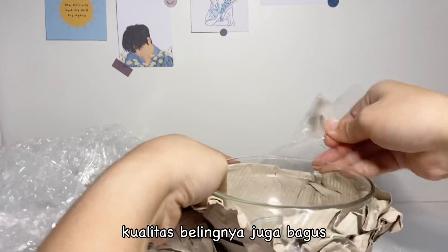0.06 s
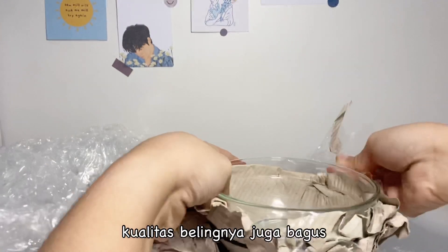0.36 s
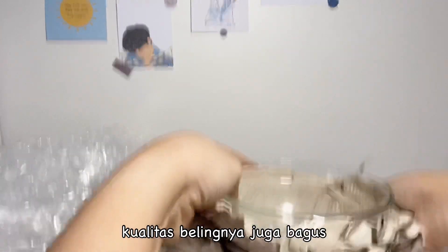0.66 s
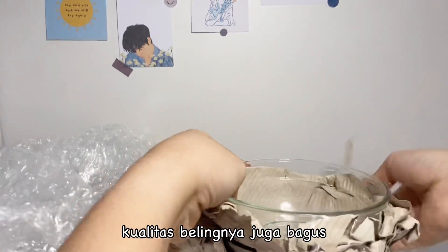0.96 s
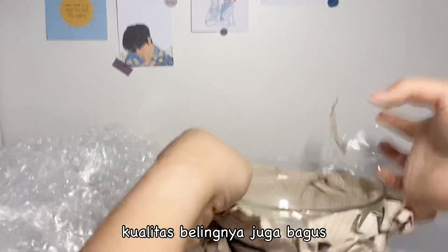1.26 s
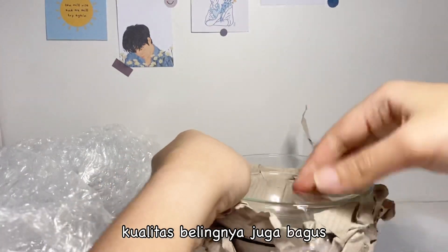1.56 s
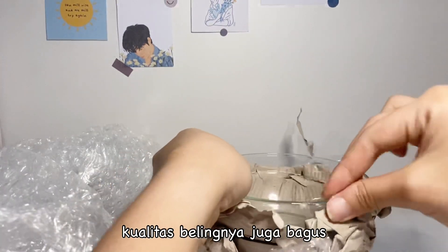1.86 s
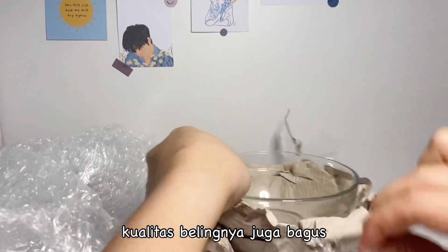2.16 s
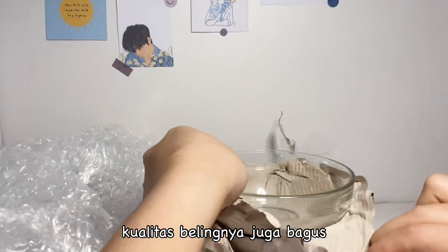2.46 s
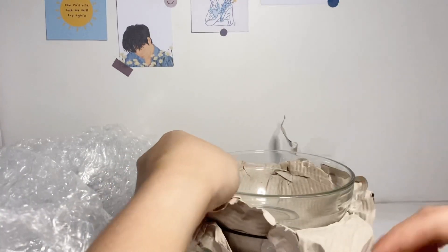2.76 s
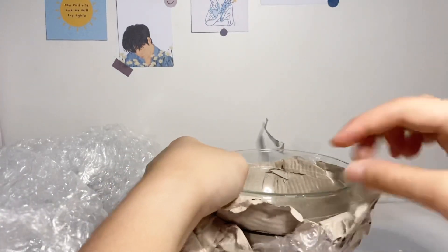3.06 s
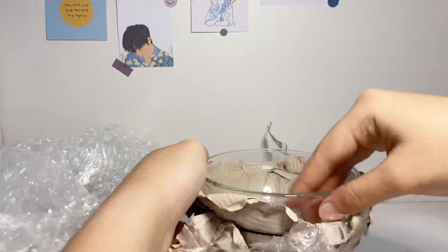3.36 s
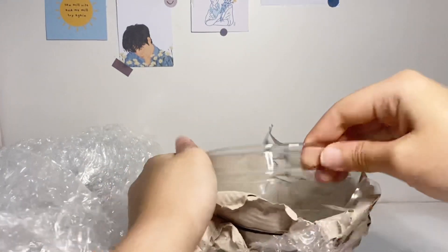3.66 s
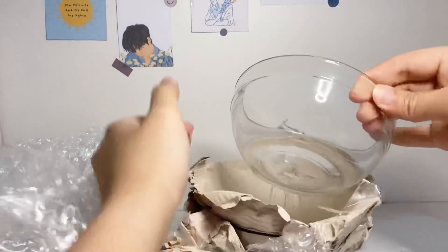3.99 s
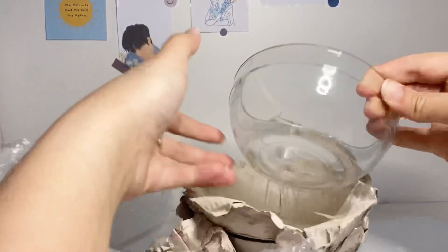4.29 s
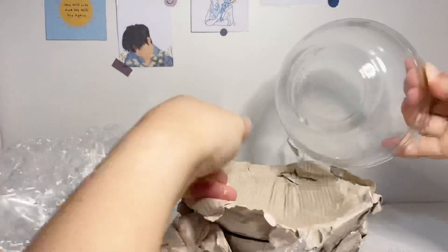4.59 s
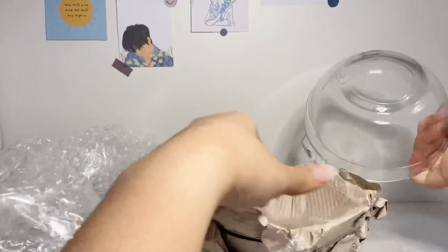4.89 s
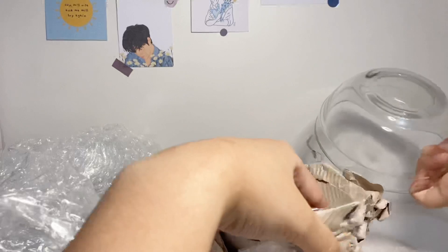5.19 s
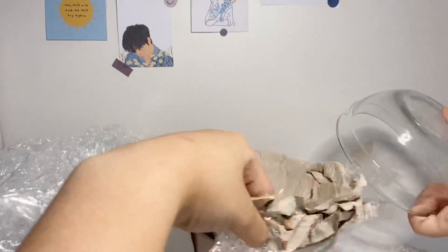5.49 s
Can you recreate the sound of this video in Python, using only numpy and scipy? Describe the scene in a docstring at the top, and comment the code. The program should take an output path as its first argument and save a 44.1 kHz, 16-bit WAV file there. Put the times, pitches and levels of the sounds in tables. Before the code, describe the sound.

Close up in a small room, stiff paper wrapping crackles and tape ticks as glass bowls are unwrapped on a table. A few low thuds and muffled knocks come first, then a light glass tink amid the sharpest paper snaps. The rustling eases, with tiny squeaks of skin and tape, and picks up again near the end. Underneath, a motor hums steadily over dull room noise, swelling somewhat midway.

```python
"""Thick crumpled paper rustles and its creases snap, close to a stereo microphone in a small room:
hands are pulling tape and wrapping off a stack of glass bowls on a table. The bundle bumps the table,
skin and tape squeak as they slip, the wrapped bowls knock together, and the glass rings faintly
where tape drags over a rim or it is touched. Underneath, a motor hums over dull room noise."""
import sys
import numpy as np
from scipy import signal
from scipy.fft import rfft, irfft, next_fast_len
from scipy.io import wavfile
from scipy.ndimage import uniform_filter1d

SR = 44100
rng = np.random.default_rng(int(sys.argv[2]) if len(sys.argv) > 2 else 0)


def unload_wav(signal):
    """Save mono or channel-first audio to the path in sys.argv[1] as 16-bit WAV at rate SR, clipped to [-1, 1]."""
    wavfile.write(
        sys.argv[1],
        SR,
        np.round(np.clip(np.atleast_2d(signal).T, -1, 1) * 32767).astype(np.int16),
    )


N = 253134
TIME = np.arange(N) / SR
CUTOFF_HZ = 16050


def from_db(db):
    """Decibels to gain."""
    return 10 ** (np.asarray(db) / 20)


def rms_one(x):
    """Scale to unit power."""
    return x / np.sqrt(np.mean(x ** 2) + 1e-20)


def in_time(rows):
    """The columns of a curve at every sample."""
    times, *columns = np.transpose(rows)
    return [np.interp(TIME, times, column) for column in columns]


def colour(x, points):
    """Minimum-phase filter through points of (frequency [Hz], gain [dB])."""
    size = 2 * next_fast_len(N // 2 + 8192)
    hz, db = np.transpose(points)
    shape = np.interp(np.log(np.arange(size // 2 + 1) * SR / size + 1), np.log(hz), db)
    cepstrum = irfft(np.log(from_db(shape)))
    cepstrum[1:size // 2] *= 2
    cepstrum[size // 2 + 1:] = 0
    return irfft(rfft(x, size) * np.exp(rfft(cepstrum)))[..., :N]


def band(x, edges, order=2):
    """Band-pass between two edges in Hz."""
    return signal.sosfilt(signal.butter(order, edges, "band", fs=SR, output="sos"), x + 1e-18)


def fade(x, decay_s):
    """Give every impulse an exponential tail."""
    return signal.lfilter([1], [1, -np.exp(-1 / (decay_s * SR))], x + 1e-18)


def add(track, start_s, sound):
    """Mix a sound in at a time."""
    at = max(round(start_s * SR), 0)
    track[..., at:at + sound.shape[-1]] += sound[..., :N - at]


def struck(blows, modes):
    """Blows ring every mode of a body; a soft contact (low corner) leaves the high modes out."""
    out = np.zeros(N)
    times, level_db, corner_hz = np.transpose(blows)
    for k, (hz, mode_db, t60) in enumerate(modes):
        force = from_db(level_db + mode_db + rng.standard_normal(len(times)))
        clicks = np.zeros(N)
        clicks[np.round(times * SR).astype(int)] = force / (1 + (hz / corner_hz) ** 2)
        r, w = from_db(-60 / (t60 * SR)), 2 * np.pi * hz / SR
        out += (-1) ** k * signal.lfilter([0, np.sin(w)], [1, -2 * r * np.cos(w), r * r], clicks + 1e-18)
    return out


# a hand rubs, crushes or pulls the wrap: (start [s], length [s], body [dB], crackle [dB], hiss [dB])
HAND_STROKES = [(0.0, 0.027, -37, -39, -39), (0.046, 0.14, -50.5, -48.5, -43), (0.289, 0.04, -55, -52, -48),
                (0.39, .06, -58, -55.5, -53.5), (0.441, 0.059, -38.5, -37, -33.5),
                (0.52, 0.18, -56.5, -57.5, -54.5), (0.77, 0.094, -55, -51.5, -51),
                (0.884, 0.06, -45, -44.5, -41.5), (0.975, 0.26, -51.5, -51, -48),
                (1.246, 0.12, -56, -58.5, -63), (1.59, 0.14, -61.5, -65, -61),
                (1.817, 0.25, -70, -61.5, -59.5), (2.076, 0.096, -44.5, -36, -38),
                (2.516, 0.022, -52, -47.5, -50), (2.721, 0.044, -51, -40, -40),
                (2.813, 0.17, -55, -55.5, -56), (2.95, 0.12, -55.5, -46, -49.5),
                (3.073, 0.099, -59, -57, -59), (3.25, 0.15, -61.5, -53.5, -61),
                (3.474, 0.096, -58, -55.5, -53.5), (3.64, 0.042, -60.5, -54, -58),
                (3.846, 0.18, -60, -64.5, -60.5), (3.95, 0.22, -59.5, -58, -53.5),
                (4.2, 0.36, -62, -64, -64), (4.71, 0.19, -60.5, -66.5, -69.5),
                (4.915, 0.019, -48, -53.5, -57), (5.099, .045, -53.5, -51.5, -49.5),
                (5.197, 0.17, -56.5, -53, -50.5), (5.375, .18, -51, -46.5, -43)]
# the wrap merely held: (body [dB], crackle [dB], hiss [dB])
RESTING_GRIP = [-61.5, -66.5, -69.5]


def handling_db(attack_s=0.0079, release_s=0.027):
    """Body, crackle and hiss levels over time: the grip tightens quickly, then the paper relaxes."""
    power = np.outer(from_db(RESTING_GRIP) ** 2, np.ones(N))
    for start, length, *zone_db in HAND_STROKES:
        t = TIME[:int((length + 8 * release_s) * SR)]
        shape = np.minimum(t / attack_s, 1) * np.exp(-np.maximum(t - length, 0) / release_s)
        add(power, start, np.outer(from_db(zone_db), shape) ** 2)
    return 10 * np.log10(power)


# thick paper at close range: (frequency [Hz], level [dB])
PAPER_SPECTRUM = [(250, 4.5), (430, 7.5), (660, 2.5), (950, 1), (1500, 2), (2000, 3), (2700, 1.5),
                  (3600, 0.5), (5000, -3), (7500, -4), (11000, -5.5), (16000, -1)]
# its body, crackle and hiss bands: (low edge [Hz], high edge [Hz])
PAPER_ZONES = [(330, 1400), (1650, 6000), (6000, 17000)]


def paper_rustle(per_s=300, spread_db=2.5, facet_db=5.5, decay_s=0.0014, crush_db=-57, rip_db=-40,
                 waver_db=0.5, waver_s=0.016):
    """Close to the microphone a light touch only rubs; under pressure fibres give way in tiny cracks."""
    pressure_waver = rms_one(uniform_filter1d(rng.standard_normal(N), size=int(waver_s * SR)))
    levels_db = handling_db() + waver_db * pressure_waver
    crackle_db = levels_db[1]
    rate = per_s * (1 + from_db(crackle_db - rip_db) ** 2)   # a hard pull crowds the cracks into a rip
    at = np.flatnonzero(rng.random(N) < rate / SR)
    sizes_db = spread_db * np.minimum(rng.exponential(1, N), 4.5)[at]
    crack_share = 1 / (1 + from_db(crush_db - crackle_db))
    out = np.zeros((2, N))
    for (low, high), level_db in zip(PAPER_ZONES, levels_db):
        zone, edges = 0, np.geomspace(low, high, num=5)
        for part in zip(edges, edges[1:]):   # each crack has its own colour
            cracks = np.zeros(N)
            cracks[at] = from_db(sizes_db + facet_db * rng.standard_normal(N)[at]) ** 2
            power = fade(cracks, decay_s)
            power /= np.abs(uniform_filter1d(power, size=3000)) + 1e-9   # the hand sets the mean power
            envelope = np.sqrt(crack_share * power + 1 - crack_share)
            zone = zone + band(envelope * rng.standard_normal((2, N)), part)
        out += from_db(level_db) * rms_one(colour(zone, PAPER_SPECTRUM))
    return out


def tape_ticks(per_s=34, top_db=-29, follows=0.81, spread_db=6.0, decay_s=0.0015, low_hz=2200):
    """Loose tape and stiff edges flick now and then, louder when the wrap is worked harder."""
    hiss_db = handling_db()[2]
    sizes = from_db(top_db + follows * (hiss_db - hiss_db.max()) + spread_db * rng.standard_normal(N))
    power = fade((rng.random(N) < per_s / SR) * sizes ** 2, decay_s)
    return band(np.sqrt(power) * rng.standard_normal((2, N)), (low_hz, CUTOFF_HZ))


# the motor running in the room: (time [s], pitch [Hz], level [dB])
MOTOR_RUN = [(0, 65.64, -34.5), (1.8, 63.7, -35.5), (2.3, 62.8, -31.5), (2.6, 63.3, -27.5),
             (3.4, 64.27, -26), (4.5, 63.73, -26.5), (5.2, 63.33, -23.5), (5.74, 62.9, -25.5)]
# its tones: (multiple of the pitch [ratio], relative level [dB])
HUM_TONES = [(.765, -23), (1.002, -1), (1.276, -16), (2.002, -19), (2.568, -27)]


def motor_hum():
    """A low hum with a few weaker tones that beat against it."""
    hz, level_db = in_time(MOTOR_RUN)
    turns = np.cumsum(hz) / SR
    out = np.zeros(N)
    for multiple, tone_db in HUM_TONES:
        out += from_db(level_db + tone_db) * np.sin(2 * np.pi * (multiple * turns + rng.random()))
    return np.sqrt(2) * out


# room tone at the microphone: (frequency [Hz], level [dB])
ROOM_SPECTRUM = [(20, -31), (40, -6), (55, 6.5), (90, 3), (130, 0.5), (170, -1.5), (210, -8.5),
                 (270, -14.5), (390, -13), (520, -23), (800, -38.5), (3000, -76), (16000, -78.5)]


def room_tone(top_db=-39.5, follows=0.058):
    """Dull room noise that grows slightly with the motor."""
    motor_db = in_time(MOTOR_RUN)[1]
    noise = rms_one(colour(rng.standard_normal((2, N)), ROOM_SPECTRUM))
    return from_db(top_db + follows * (motor_db - motor_db.max())) * noise


def small_snaps(per_s=12, offsets_db=(9, 2, -3.5), spread_db=6, buckles_db=-53.5):
    """Rows of lesser creases that give way at random during a firm stroke, in proportion to its force."""
    rows = []
    for start, length, body, crackle, hiss in HAND_STROKES:
        waits, sizes = rng.random((2, 16))
        delays = np.cumsum(-np.log(waits)) / per_s
        typical_db = np.array([crackle, body, hiss]) + offsets_db
        for delay, size in zip(delays, 2 * sizes - 1):
            if delay < length and crackle > buckles_db:
                rows.append((start + delay, *(typical_db + spread_db * size)))
    return rows


# creases giving way close to the microphone: (time [s], crack [dB], body [dB], hiss [dB])
CREASES = [(0.04, -19, -40, -21), (0.0962, -25, -61, -36), (.114, -42, -60, -32), (0.2357, -30.5, -49, -31),
           (0.3743, -30, -56, -42), (.7885, -32, -45.5, -31.5), (0.827, -33, -60, -28),
           (0.9503, -46, -40, -27), (1.0194, -26.5, -41, -27.5), (1.1367, -25.5, -29.5, -29.5),
           (1.2016, -19, -30.5, -26.5), (1.224, -23.5, -32, -35), (1.3596, -37, -46, -42.5),
           (1.5893, -29.5, -42, -55), (1.601, -27.5, -40, -41.5), (1.6838, -28, -45, -38),
           (1.7774, -28, -47, -31), (1.856, -39, -67, -37), (1.8796, -33, -64, -35.5),
           (1.9168, -31, -58, -42), (1.9448, -22, -56, -28.5), (1.957, -12.5, -40.5, -25),
           (2.0144, -30.5, -67, -25), (2.0728, -20, -66, -31), (2.0813, -15, -33, -21.5),
           (2.0968, -27, -48, -20.5), (2.147, -15.5, -60, -36), (2.1979, -21.5, -43, -38),
           (2.3043, -34, -54, -51), (2.4565, -34, -65, -37.5), (2.4792, -31.5, -59, -50),
           (2.5152, -11, -26.5, -32), (2.6506, -32.5, -74, -38.5), (2.6867, -34, -40.5, -40.5),
           (2.7325, -26, -36, -31), (2.7392, -21, -54, -27), (2.754, -22, -39, -27.5),
           (2.7807, -21, -25.5, -28), (2.8826, -31.5, -35, -38), (2.9282, -27, -35.5, -32.5),
           (2.974, -27, -54, -43), (3.0084, -24, -61, -37), (3.0305, -23, -62, -38),
           (3.0441, -26.5, -31, -31), (3.0794, -23.5, -68, -32), (3.108, -30.5, -53, -36.5),
           (3.2284, -23.5, -48, -30.5), (3.418, -25.5, -63, -46), (4.1635, -34.5, -47, -40.5),
           (4.4672, -31, -48.5, -35.5), (4.6315, -60, -63, -40.5), (4.9369, -27.5, -51, -34),
           (4.954, -28.5, -65, -33.5), (5.085, -38.5, -46, -36.5), (5.482, -28.5, -58, -39),
           (5.5544, -24.5, -39, -40.5), (5.5627, -29, -43, -41.5), (5.7025, -28.5, -54, -29)]


def crease_snaps(rise_s=0.000769, decay_s=0.0023, settle_db=-20, settle_s=0.015,
                 facet_hz=2657, facet_cycles=5.2, octaves_per_db=0.2, hollow_hz=1100, hollow_s=0.0021):
    """A crease buckles: a crack, a short ring of the facet and the hollow behind it, then it settles."""
    t = TIME[:SR // 10]
    rise = 1 - np.exp(-t / rise_s)   # the buckle runs along the crease
    settling = from_db(settle_db) * np.exp(-t / settle_s)
    zones, rings = np.zeros((3, 2, N)), np.zeros((2, N))
    for start, crack, body, hiss in CREASES + small_snaps():
        octaves_up = octaves_per_db * max(hiss - crack + 7, 0)   # hissier snaps have smaller facets
        hz = facet_hz * 2 ** octaves_up * rng.lognormal(0, 0.048)
        levels = from_db([body, crack - 6, hiss + 4])   # the first instant is the brightest
        for zone, level, stretch, (low, high) in zip(zones, levels, (2, 1, 1), PAPER_ZONES):
            shape = rise * (np.exp(-t / (decay_s * stretch)) + settling)   # lows last longer
            noise = rng.standard_normal((2, len(t))) * np.sqrt(SR / 2 / (high - low))
            add(zone, start, level * shape * noise)
        facet = from_db(crack - 4) * np.sin(2 * np.pi * hz * t) * np.exp(-t * hz / facet_cycles)
        cavity_hz = hollow_hz * rng.lognormal(0, 0.085)
        hollow = from_db(body + 2) * np.sin(2 * np.pi * cavity_hz * t) * np.exp(-t / hollow_s)
        mid_side = [1, rng.normal(0, 0.12)]
        add(rings, start + rise_s, np.outer(mid_side, facet + hollow))
    return rings + sum(band(zone, edges, order=3) for zone, edges in zip(zones, PAPER_ZONES))


# the bundle meets the table: (time [s], level [dB], contact corner [Hz])
BUNDLE_BUMPS = [(0.058, -28, 398), (0.294, -25, 293), (0.604, -13.5, 300), (0.648, -13.5, 70.4),
                (1.228, -10, 830), (1.279, -23, 400), (3.556, -23, 394), (4.347, -25.5, 393.2)]
# the table's modes: (frequency [Hz], level [dB], t60 [s])
TABLE_MODES = [(45, -7, 0.16), (87.6, -0.5, 0.19), (122.7, -0.5, 0.12), (204.3, 2, 0.088),
               (265, 6.5, 0.0051), (384, -3.5, 0.068), (548, -9.5, 0.024), (686, -22, 0.07)]


def table_bumps():
    """The bundle thuds on the table, straight ahead of the microphone."""
    return struck(BUNDLE_BUMPS, TABLE_MODES)


# skin and tape slipping, close up: (peak time [s], pitch [Hz], level [dB])
SLIPS = [(0.797, 2800, -47), (0.839, 2820, -46.5), (4.837, 970, -53.5), (4.902, 2282, -50.5),
         (5.127, 2150, -49.5), (5.148, 934, -48.5)]


def slip_squeaks(swell_s=0.01, width=0.063):
    """Uneven stick and slip: a narrow rough tone that swells and dies."""
    out = np.zeros((2, N))
    t = TIME[:SR // 10] - TIME[SR // 20]
    swell = np.exp(-(t / swell_s) ** 2 / 2)
    for peak_s, hz, level_db in SLIPS:
        tone = rms_one(band(rng.standard_normal((2, len(t))), hz * np.exp([-width, width])))
        add(out, peak_s + t[0], from_db(level_db) * tone * swell)
    return out


# bowl against bowl inside the wrap: (time [s], level [dB], contact corner [Hz])
STACK_KNOCKS = [(1.138, -31, 2000), (1.203, -26, 2000), (3.046, -35, 2000)]
# the stack's muffled modes: (frequency [Hz], level [dB], t60 [s])
STACK_MODES = [(440, -1, .04), (590, -2, .035), (1040, -1, .05)]


def bowl_knocks():
    """The wrapped bowls knock together with a short, dull ring."""
    return struck(STACK_KNOCKS, STACK_MODES)


# tape drags over a rim, faint even this close: (time [s], level [dB])
RIM_DRAG = [(1.34, -76), (1.42, -71.5), (1.58, -66), (1.65, -65), (1.85, -65.5), (1.93, -81)]


def rim_song(mode_hz=2545, width=0.02):
    """Friction keeps one mode of the bowl ringing."""
    dragging = (TIME > RIM_DRAG[0][0]) & (TIME < RIM_DRAG[-1][0])
    ring = band(rng.standard_normal(N), mode_hz * np.exp([-width, width]))
    return dragging * from_db(in_time(RIM_DRAG)[0]) * rms_one(ring)


# touches on the glass: (time [s], level [dB], contact corner [Hz])
GLASS_TOUCHES = [(1.602, -57, 3000), (1.957, -28, 9000), (2.516, -48, 4000)]
# one bowl's modes: (frequency [Hz], level [dB], t60 [s])
BOWL_MODES = [(1143, 0, 0.05), (2550, 4, 0.027), (2860, 9, 0.031), (3560, -11, 0.21), (4980, -8, .07),
              (7670, 4.5, 0.037)]


def glass_tinks():
    """A light touch sets a bowl's high modes ringing briefly."""
    return struck(GLASS_TOUCHES, BOWL_MODES)


def small_room(x, wet_db=-15, t60=0.11, first_s=0.00161, wall_hz=7000):
    """Add dense, slightly dull reflections off near walls."""
    t = TIME[:SR // 2]
    echoes = rng.standard_normal((2, len(t))) * from_db(-60 * t / t60) * (t > first_s)
    echoes = fade(echoes, 1 / (2 * np.pi * wall_hz))
    echoes /= np.sqrt(np.sum(echoes ** 2, axis=1, keepdims=True))
    return x + from_db(wet_db) * signal.fftconvolve(x[:1], echoes, axes=1)[:, :N]


# what the pair takes up in common and in opposition, and its lean left: (frequency [Hz], gain [dB])
MID_RESPONSE = [(100, -2), (8200, 1), (8750, -14), (9300, -13), (9900, 0.5), (12300, 0.5), (12950, -29),
                (13650, -38), (14400, 2), (16000, -12.5)]
SIDE_RESPONSE = [(60, -11), (150, -12.5), (500, -5), (1000, -2), (2700, -5), (4500, -4.5), (7000, -5.5),
                 (9000, 3.5), (11000, -6), (13300, -1), (16000, -10)]
LEFT_LEAN = [(100, 0.47), (500, 0), (1000, -0.06), (2300, 0.83), (4500, 1), (8000, 0.16)]


def microphone_pair(mid, side):
    """The stereo pair colours mid and side and turns them into left and right."""
    mid, side = colour(mid, MID_RESPONSE), colour(side, SIDE_RESPONSE)
    left = colour(mid + side, LEFT_LEAN)
    right = colour(mid - side, np.array(LEFT_LEAN) * [1, -1])
    return np.array([left, right])


def scene():
    """Paper and glass up close with the room's reflections, over dry bumps, hum and room tone."""
    ahead = np.array([[1], [0]])   # all mid, no side
    glass = glass_tinks() + bowl_knocks() + rim_song()
    lows = room_tone() + ahead * (table_bumps() + motor_hum())
    wrap = paper_rustle() + tape_ticks() + slip_squeaks() + crease_snaps()
    mid, side = small_room(wrap + ahead * glass) + lows
    return microphone_pair(mid, side)


def record(dry):
    """A steep low-pass cuts the highest treble."""
    return signal.sosfilt(signal.ellip(10, .2, 90, CUTOFF_HZ, fs=SR, output="sos"), dry)


dry = scene()
out = record(dry)
unload_wav(out)
```